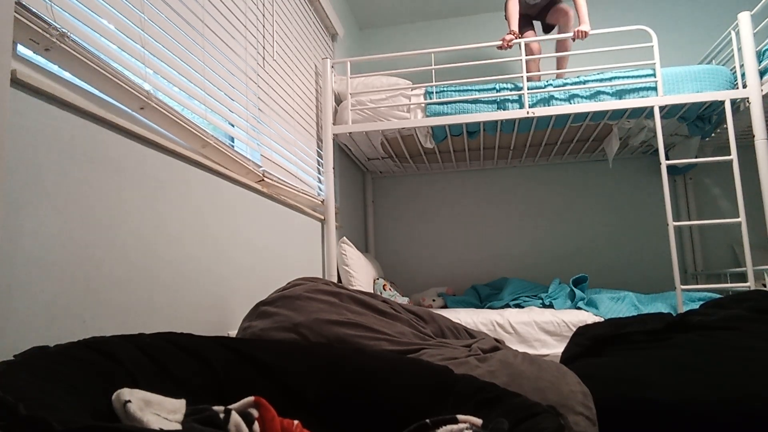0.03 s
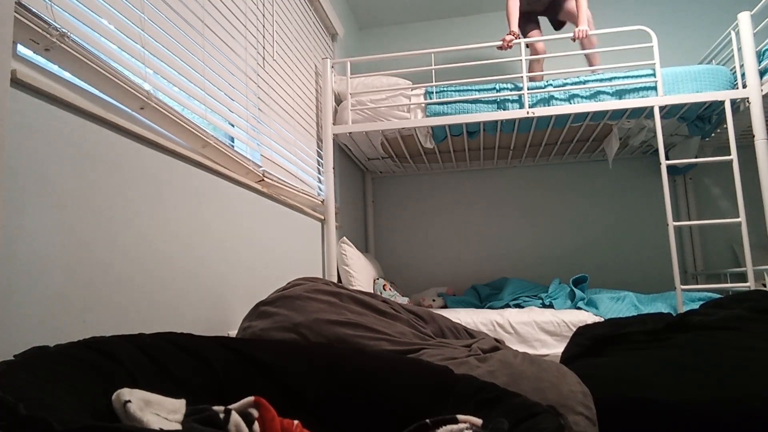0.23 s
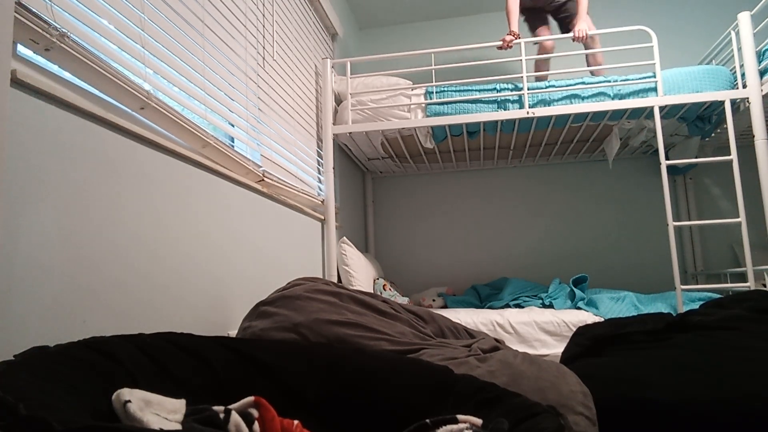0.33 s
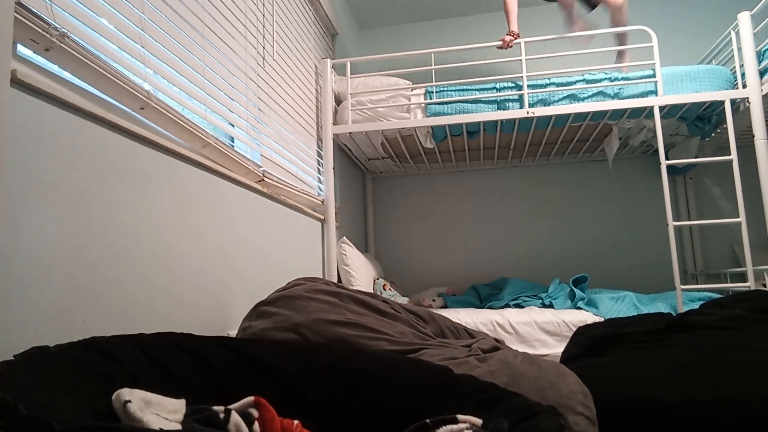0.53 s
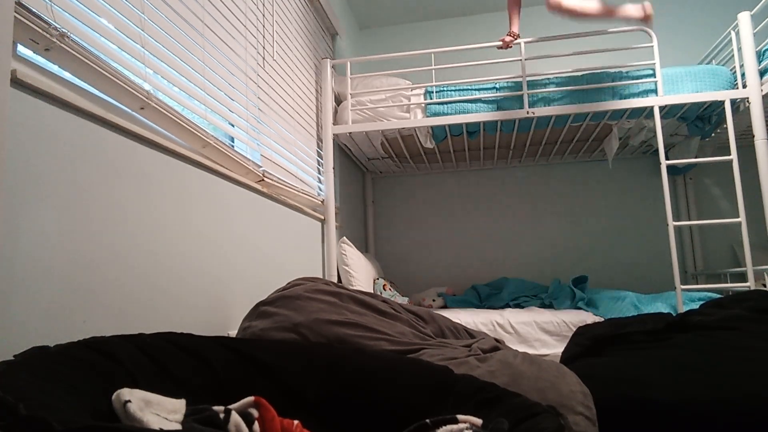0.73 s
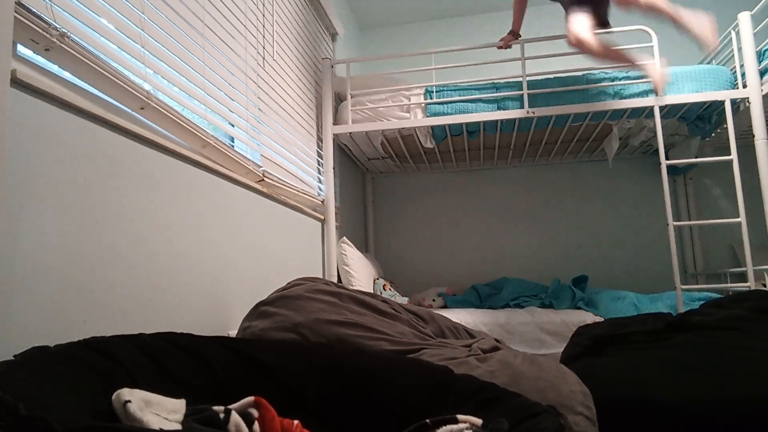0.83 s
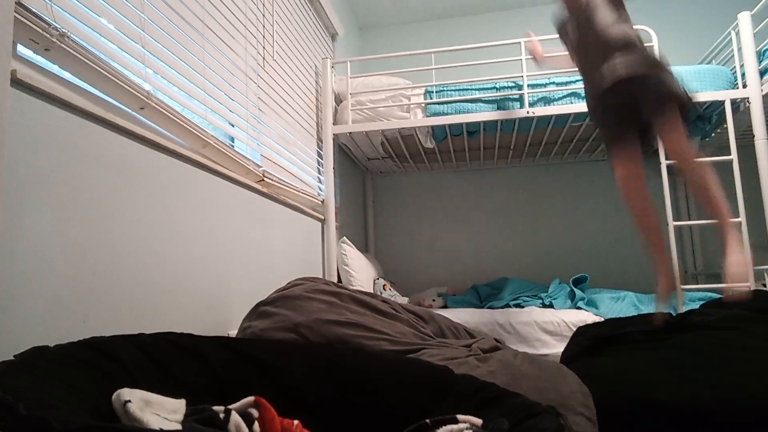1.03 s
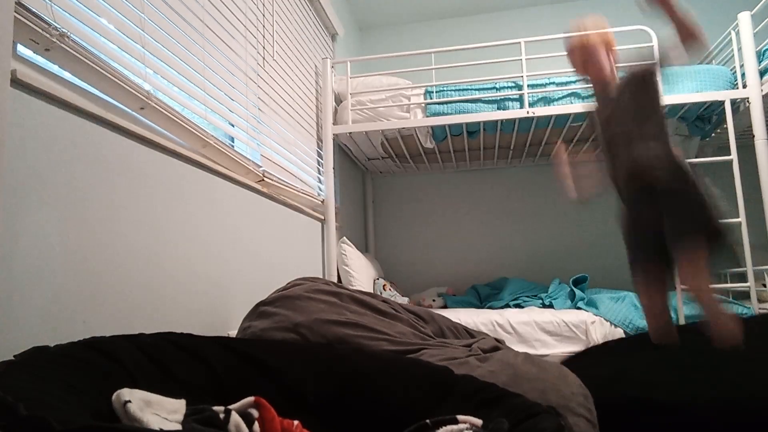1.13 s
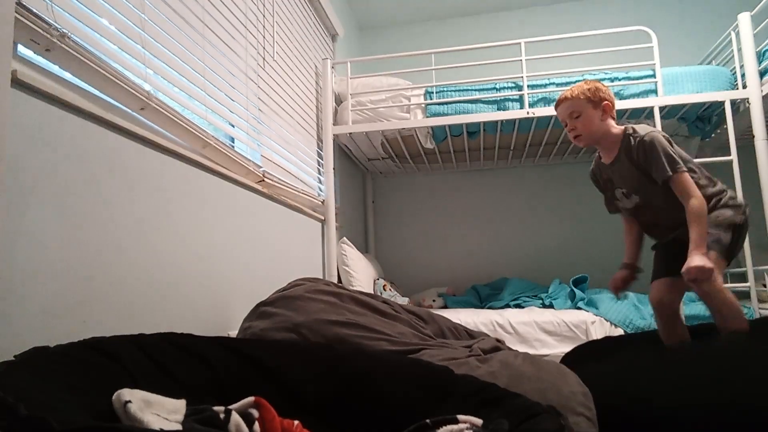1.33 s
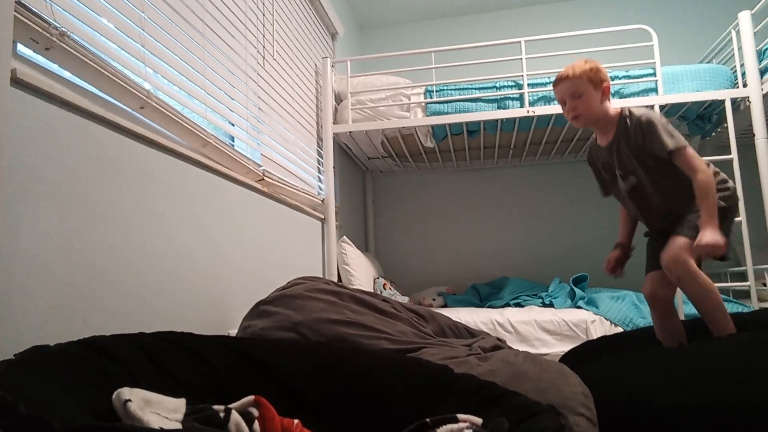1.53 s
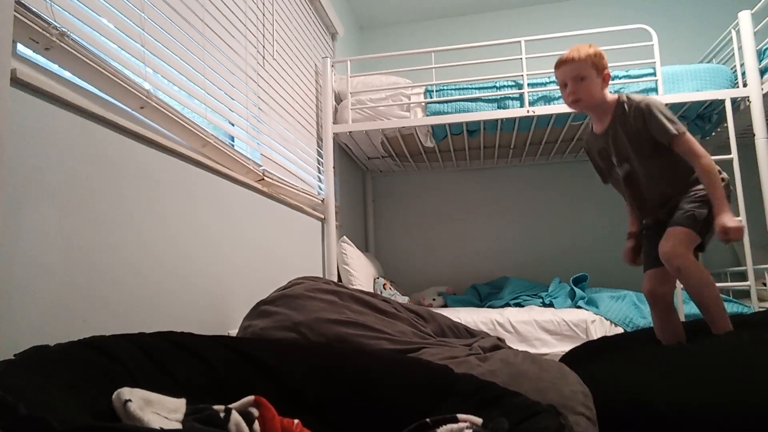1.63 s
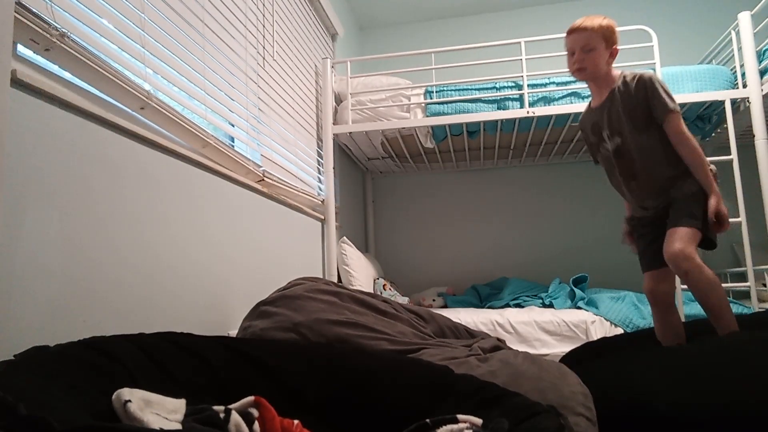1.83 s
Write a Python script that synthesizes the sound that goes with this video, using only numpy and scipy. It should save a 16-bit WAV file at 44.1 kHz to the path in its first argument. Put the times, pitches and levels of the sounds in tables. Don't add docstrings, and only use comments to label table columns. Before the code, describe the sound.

Steel bed frame knocks sharply, springs ping, and a jump ends in a soft, heavy beanbag thud

```python
import sys
import numpy as np
from scipy import signal
from scipy.fft import rfft, irfft, next_fast_len
from scipy.io import wavfile
from scipy.ndimage import map_coordinates

SR = 44100
rng = np.random.default_rng(int(sys.argv[2]) if len(sys.argv) > 2 else 0)


def materialize(psi):
    bounded = np.clip(np.atleast_2d(psi).T, -1, 1)
    quanta = np.round(bounded * 32767).astype(np.int16)
    wavfile.write(sys.argv[1], SR, quanta)


def decibels_to_gain(level_db):
    exponent = np.asarray(level_db, float) / 20
    return 10 ** exponent


N = 83790

# (time [s], crack level [dB], tube level [dB], rise [ms], ring level over tube [dB])
CLACKS = [
    (0.2131, -29, -35, 0.52, -5.5),
    (0.382, -35, -46, 4.4, -20),
    (0.6225, -32.5, -40, 0.73, -3),
    (0.835, -57, -55, 1.42, -16),
    (0.881, -47, -57.5, 5.9, -20),
    (0.965, -60, -62, 1.6, -9),
    (1.252, -50.5, -58, 1.2, -18),
    (1.4912, -69.5, -98, 1.23, -28),
]
# (frequency [Hz], density [dB per Hz])
CRACK = [(2650, -35), (4500, -18.5), (6420, -15), (7650, -7.5), (8290, -8), (8970, 0), (9510, -6.5),
         (10000, -8.5), (16000, -32.5)]
HARD_RISE_S = 0.0016
DAMPED_AT_S = 0.18


def unit(x):
    return x / np.sqrt(np.mean(x ** 2) + 1e-20)


def along(points, hz):
    f, v = np.transpose(points)
    return np.interp(np.log(hz + 1), np.log(f + 1), v)


def curve(rows, lag_s=0):
    s, v = np.transpose(rows)
    return np.interp(np.arange(N) / SR - lag_s, s, v)


def wobble(rate_hz, size=N):
    knots = rng.standard_normal(int(size * rate_hz / SR) + 4)
    return map_coordinates(knots, [np.arange(size) * rate_hz / SR])


def colour(x, spectrum):
    m = next_fast_len(len(x) + 8192)
    gain = decibels_to_gain(along(spectrum, np.fft.rfftfreq(m, 1 / SR)))
    return unit(irfft(rfft(x, m) * gain, m)[:len(x)])


def grains(per_s, spread_db, share):
    size = decibels_to_gain(spread_db * np.minimum(rng.exponential(size=N), 3))
    contacts = (rng.random(N) < per_s / SR) * rng.standard_normal(N) * size
    return share * unit(contacts) + rng.standard_normal(N)


def knocks(rows, attack_s):
    out, t = np.zeros(N + SR), np.arange(SR // 4) / SR
    for s, db, hz, t60_s in rows:
        decay = decibels_to_gain(db - 60 * t / t60_s + 2.8 * wobble(126, len(t)))
        out[round(s * SR):][:len(t)] += decay * np.sin(2 * np.pi * hz * t) * (1 - np.exp(-t / attack_s))
    return out[:N]


def burst(spectrum, rise_s, t, late_s):
    # (frequency [Hz], t60 [s])
    dying = [(700, 0.25), (2000, 0.4), (5000, 0.24), (9000, 0.18), (15000, 0.12)]
    hz, frames_s, z = signal.stft(colour(rng.standard_normal(len(t)), spectrum), SR, nperseg=128)
    swell = 1 - np.exp(-(frames_s * (hz[:, None] + 1) / (late_s * 1000 + 1e-9)) ** 2)
    decay = decibels_to_gain(-60 * frames_s / along(dying, hz)[:, None])
    tail = signal.istft(z * swell * decay, SR, nperseg=128)[1][:len(t)]
    echoes = decibels_to_gain(0.5 * np.exp(-t / 0.0089) * wobble(520, len(t)))
    gap = 1 - 0.7 * np.exp(-t / 0.02) * (rise_s < HARD_RISE_S)
    return tail * echoes * gap * (1 - np.exp(-t / rise_s))


def steel_ring(modes, t):
    ring = np.zeros(len(t))
    for hz, db, t60_s in modes:
        level = decibels_to_gain(db + rng.normal(0, 1.7) + 3 * wobble(42, len(t)) - 60 * t / t60_s)
        pitch_hz = hz + 5 * np.sqrt(hz / 1000) * wobble(90, len(t))
        phase = 2 * np.pi * (rng.random() + np.cumsum(pitch_hz) / SR)
        ring += level * (1 - np.exp(-t * hz / 12)) * np.sin(phase)
    return ring


def frame():
    # (frequency [Hz], density [dB per Hz])
    tube_spectrum = [(450, -46), (750, -6), (1100, -6.5), (2000, -6.5), (3200, 0), (4100, -4.5),
                     (5500, -21), (7500, -47)]
    # (frequency [Hz], level [dB], t60 [s])
    steel = [(775, -10, .15), (1330, -14, .42), (1567, -5, .19), (2191, -9, .33), (2727, 0, .14),
             (3040, -3, .2), (3225, -3, .17), (3600, -3, .22), (6745, -4, .17), (7470, -1, .11),
             (7845, 4, .12), (8590, -1, .18), (9200, 0, .13),
             (4307, -9, .15), (6950, -10, .24), (7327, -9, .2), (8021, -5, .2), (8790, -3, .2),
             (9266, -2, .13), (9225, -12, .45), (9470, -3, .12), (9787, -14, .3), (1900, -4, .14),
             (2030, -5, .13), (3340, -4, .2), (4750, -9, .12)]
    out, t = np.zeros(N + SR), np.arange(SR * 2 // 5) / SR
    damp = decibels_to_gain(-600 * np.maximum(t - DAMPED_AT_S, 0))
    for s, crack_db, tube_db, rise_ms, ring_db in CLACKS:
        rise_s = max(rise_ms, .2) / 1000
        ring = damp * steel_ring(steel, t) * (1 - np.exp(-t / (rise_s + 0.003)))
        late_s = 0.0098 / (1 + (rise_s / HARD_RISE_S) ** 4)
        tube = decibels_to_gain(-100 * t) * burst(tube_spectrum, rise_s, t, late_s) + decibels_to_gain(ring_db) * ring
        crack = burst(CRACK, rise_s, t, 0.00083)
        out[round(s * SR):][:len(t)] += decibels_to_gain(crack_db) * crack + decibels_to_gain(tube_db) * tube
    return out[:N]


def clicks():
    # (delay [ms], level [dB])
    walls = [(0, 0), (2.65, 1.5), (3.9, -3), (6.55, -2), (9.5, -1), (10.85, -4), (13.6, -3), (15.8, -5),
             (23, -6), (27.1, -7), (33.5, -11)]
    # (time [s], peak [dB])
    chatter = [(.3829, -44), (.3841, -39), (.3868, -35), (.3882, -33), (.3895, -32), (.3918, -29),
               (.3948, -34), (.3969, -35), (.4161, -39), (.8853, -46), (.8922, -46), (.8951, -43),
               (.8978, -45), (.917, -48)]
    impulse, train = np.zeros(801), np.zeros(N)
    impulse[400] = 1
    t, edge = (np.arange(801) - 400) / SR, colour(impulse, CRACK)
    resonance = np.cos(2 * np.pi * 8500 * t)
    shape = (resonance + 0.3 * edge / edge.max()) * np.exp(-(t / .00042) ** 2)
    for s, crack_db, _, rise_ms, _ in CLACKS:
        hard = decibels_to_gain(crack_db + 7.5) * (rise_ms / 1000 < HARD_RISE_S)
        for ms, db in walls:
            level = hard * decibels_to_gain(db + rng.normal(0, 1.7))
            train[round((s + .0018 + ms / 1000) * SR)] += level * rng.choice([-1, 1])
    for s, db in chatter:
        train[round(s * SR)] += decibels_to_gain(db) * rng.choice([-1, 1])
    return signal.fftconvolve(train, shape / np.abs(shape).max(), "same")


def rail():
    start_s, rail_hz, level_db, t60_s = .63, 5536, -61, .6
    t = np.arange(N) / SR - start_s
    touch_db = -900 * np.maximum(t - DAMPED_AT_S + .012, 0)
    swell = np.clip(t / .01, 0, 1) * decibels_to_gain(level_db - 60 * t / t60_s + touch_db + 3 * wobble(50))
    return swell * np.sin(2 * np.pi * np.cumsum(rail_hz + 14 * wobble(60)) / SR)


def springs():
    # (frequency [Hz], width [Hz], level [dB])
    resonances = [(1330, 120, -7), (1655, 55, 0), (2620, 300, -9), (3500, 400, -11)]
    # (time [s], level [dB])
    shake = [(.92, -110), (.965, -65.5), (1.0, -63), (1.07, -68), (1.14, -65), (1.25, -65), (1.33, -108)]
    # (time [s], peak [dB], ring [Hz], t60 [s])
    pings = [(.45, -61, 930, .12), (.836, -48, 2400, .045), (.842, -57, 1800, .06), (.845, -56, 2750, .07),
             (.848, -60, 3550, .08), (.855, -62, 1130, .08), (1.205, -59, 4300, .07),
             (1.22, -52, 1975, .07), (1.232, -49, 2510, .065), (1.238, -57, 1690, .06),
             (1.55, -68, 1370, .15), (1.555, -65, 580, .12), (1.611, -62, 3050, .06)]
    m = next_fast_len(N + 8192)
    f = np.fft.rfftfreq(m, 1 / SR)
    response = sum(decibels_to_gain(db) * 1j * f * w / (c * c - f * f + 1j * f * w) for c, w, db in resonances)
    jolts = grains(600, 2, 0.89)
    jangle = unit(irfft(rfft(jolts, m) * response, m)[:N])
    return decibels_to_gain(curve(shake) + 2 * wobble(29.8)) * jangle + knocks(pings, 0.0027)


def landing():
    # (time [s], peak [dB], ring [Hz], t60 [s])
    thumps = [(1.101, -41.5, 302, 0.072), (1.108, -46, 993, 0.037), (1.1195, -27, 151, 0.075),
              (1.124, -37.5, 583, 0.1), (1.127, -37, 432, 0.069), (1.1465, -29, 230.4, 0.088),
              (1.148, -35, 323, 0.083), (1.151, -38, 694, 0.041), (1.159, -34.5, 117, 0.19),
              (1.1685, -33.5, 215.5, 0.097), (1.185, -36, 104, 0.051), (1.186, -32.5, 330, 0.038),
              (1.203, -43.5, 609, 0.05), (1.2215, -29, 67, 0.03), (1.248, -44.5, 110, 0.065),
              (1.258, -50, 222.4, 0.15), (1.27, -52, 302, 0.068), (1.296, -42, 97, 0.037),
              (1.331, -50, 59, 0.069), (1.35, -55, 204, 0.12), (1.379, -49, 86, 0.1),
              (1.473, -40, 157, 0.032), (1.473, -52.5, 315, 0.056), (1.545, -51.5, 119, 0.041)]
    # (time [s], level [dB])
    squash = [(1.088, -67.5), (1.102, -51), (1.125, -38), (1.16, -49), (1.2, -50), (1.27, -59),
              (1.3, -68.5), (1.4, -68), (1.45, -71)]
    # (time [s], level [dB])
    pour = [(1.088, -72), (1.1, -58.5), (1.135, -56.5), (1.16, -58.5), (1.215, -53.5), (1.26, -63.5),
            (1.32, -90)]
    # (frequency [Hz], density [dB per Hz])
    bag = [(30, -6.5), (150, 0), (300, -7), (600, -11.5), (1100, -15.5), (2500, -48)]
    # (frequency [Hz], density [dB per Hz])
    bead_spectrum = [(470, -36), (800, -3), (1460, -5.5), (2530, -5.5), (5240, -22.5), (8880, -8),
                     (16000, -44)]
    floor = [(25, -52), (45, -12), (80, -21), (200, -120)]  # (frequency [Hz], density [dB per Hz])
    whoomp = decibels_to_gain(curve(squash) + 1.5 * wobble(59.84)) * colour(rng.standard_normal(N), bag)
    sway = decibels_to_gain(-13 + curve(squash, lag_s=0.091)) * colour(rng.standard_normal(N), floor)
    beads = decibels_to_gain(curve(pour) + 2 * wobble(70)) * colour(grains(3600, 2.4, 0.66), bead_spectrum)
    return knocks(thumps, 0.0017) + whoomp + sway + beads


def bedding():
    # (time [s], peak [dB], ring [Hz], t60 [s])
    steps = [(.352, -61, 400, .05), (.398, -56, 84, .09), (.42, -57, 112, .1), (.46, -55, 395, .063),
             (.462, -59, 222, .069), (.464, -52, 86, .1), (.572, -52, 68, .082), (.63, -56, 83, .2),
             (.82, -59, 110, .05), (.85, -58, 65, .12), (1.555, -61, 290, .08)]
    # (time [s], level [dB])
    stir = [(0, -72.5), (.1, -68), (.19, -70), (.33, -58), (.46, -56.5), (.52, -61), (.575, -56),
            (.62, -67.5), (.8, -75), (1.0, -60.5), (1.08, -78), (1.38, -69), (1.45, -78), (1.57, -75.5),
            (1.7, -79.5), (1.84, -78), (1.9, -68)]
    # (time [s], level [dB])
    load = [(0, -78), (.17, -80), (.22, -68), (.35, -66), (.41, -66.5), (.47, -57.5), (.52, -67.5),
            (.57, -59), (.66, -75), (.9, -82.5), (.97, -63.5), (1.05, -72), (1.3, -72.5), (1.4, -78),
            (1.5, -76.5), (1.57, -67.5), (1.63, -76.5), (1.9, -86.5)]
    # (frequency [Hz], density [dB per Hz])
    cloth = [(410, -64), (700, -17), (1260, -6), (2590, -10.5), (3600, -9), (3890, -13), (5920, -16.5),
             (8760, -3.5), (16000, -40.5)]
    # (frequency [Hz], density [dB per Hz])
    creak = [(30, -40), (80, 0.5), (200, -8.5), (400, -7.5), (900, -12.5), (1400, -33.5)]
    rustle = decibels_to_gain(curve(stir) + wobble(23.7)) * colour(grains(1500, 3.6, 0.45), cloth)
    lumps = decibels_to_gain(curve(load) + 1.18 * wobble(21.7)) * colour(rng.standard_normal(N), creak)
    return knocks(steps, 0.0029) + rustle + lumps


def room():
    # (time [s], level [dB])
    hum_level = [(0, -61), (.24, -60.5), (.34, -67), (.56, -76), (1.4, -78), (1.56, -68), (1.9, -70)]
    # (frequency [Hz], density [dB per Hz])
    rumble_spectrum = [(25, -51), (55, 2.5), (110, 1), (160, -14), (400, -14.5), (1200, -32), (2000, -76)]
    # (frequency [Hz], density [dB per Hz])
    hiss_spectrum = [(700, -40), (1200, -4), (3200, -5), (5500, -16), (8800, -21), (11000, -22),
                     (16000, -14)]
    hum_hz, hiss_db, rumble_db = 110, -76.5, -75
    tone = np.sqrt(2) * np.sin(2 * np.pi * np.cumsum(hum_hz + .6 * wobble(8)) / SR)
    hum = decibels_to_gain(curve(hum_level) + .8 * wobble(15)) * tone
    hiss = decibels_to_gain(hiss_db + 1.6 * wobble(12.7)) * colour(rng.standard_normal(N), hiss_spectrum)
    rumble = decibels_to_gain(rumble_db + 2.0 * wobble(5.5)) * colour(rng.standard_normal(N), rumble_spectrum)
    return hum + hiss + rumble


def scene():
    return (frame() + clicks() + rail() + springs() + landing() + bedding() + room())[None]


def top_cut(x):
    return signal.sosfilt(signal.butter(12, 16520, fs=SR, output="sos"), x)


def record(dry):
    top_hz, limit_hz, low_cut_hz, top_loss_db = 15700, 16520, 33, -40
    f = np.fft.rfftfreq(N, 1 / SR)
    low_cut = f ** 4 / (f ** 4 + low_cut_hz ** 4)
    band = decibels_to_gain(top_loss_db * np.clip((f - top_hz) / 100, 0, 1)) * (f < limit_hz) * low_cut
    attack = sum(np.exp(-((np.arange(N) / SR - row[0] - .003) / .004) ** 2) for row in CLACKS[:3])
    top = attack * irfft(rfft(dry) * (f > top_hz) * (f < limit_hz), N)
    return top_cut(irfft(rfft(dry) * band, N) + top)


dry = scene()
out = record(dry)
materialize(out)
```